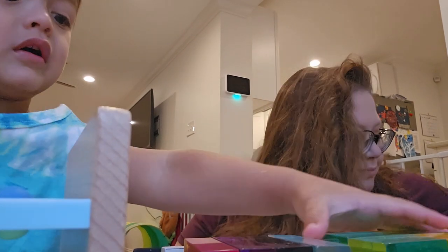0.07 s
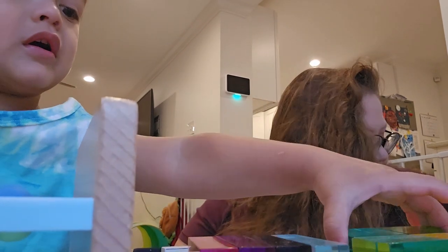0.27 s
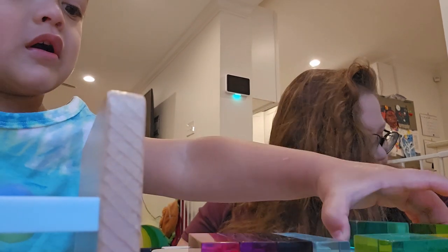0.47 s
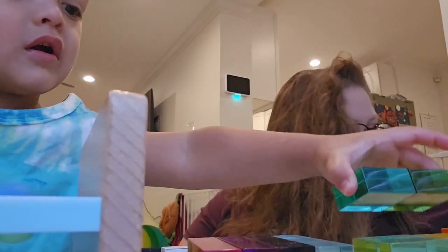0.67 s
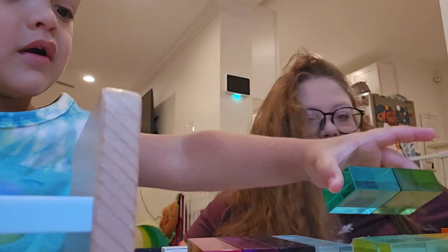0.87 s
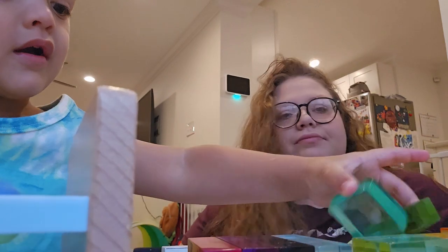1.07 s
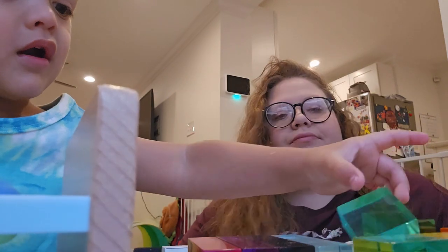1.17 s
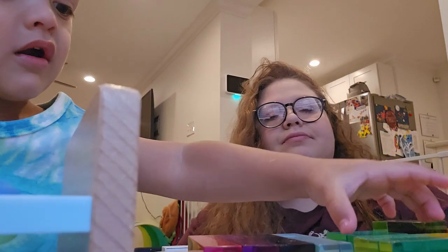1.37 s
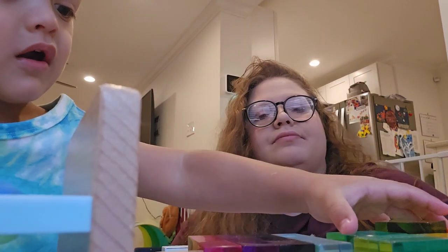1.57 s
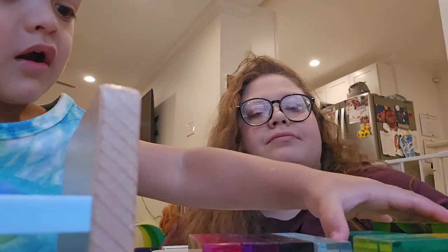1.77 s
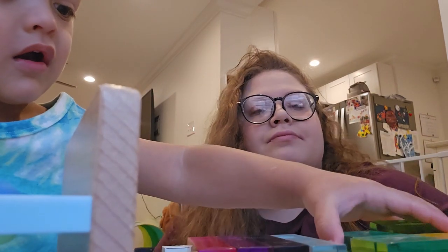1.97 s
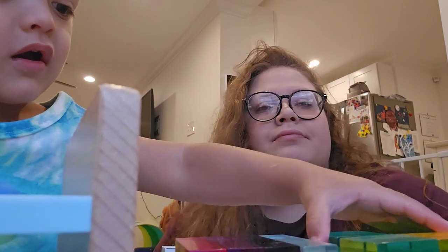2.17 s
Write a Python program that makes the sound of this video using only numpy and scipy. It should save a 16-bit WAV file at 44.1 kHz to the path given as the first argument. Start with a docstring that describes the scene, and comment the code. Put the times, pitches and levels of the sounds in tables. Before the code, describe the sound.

Hard plastic blocks click and clatter on a wooden tray as a hand moves them

```python
"""Room rumble, hiss and mains hum come first, under the soft grit of a hand sliding blocks on a tray.
Hard plastic blocks then click and knock on the wooden tray, on a table close to a two-port microphone:
each click is a short burst of decaying block modes with a noise tick, a hollow knock and a tray thump.
Wall echoes and a short room tail follow, the table jolts at times, and a heap of blocks rattles as it
settles. Sliding is filtered uneven noise; the rattle is many small random contacts."""
import sys
import numpy as np
from scipy import signal
from scipy.fft import rfft, irfft, next_fast_len
from scipy.io import wavfile
from scipy.ndimage import uniform_filter1d

SR = 44100
rng = np.random.default_rng(int(sys.argv[2]) if len(sys.argv) > 2 else 0)


def level_to_linear(level):
    """Convert decibel levels to linear amplitude factors, elementwise."""
    exponent = np.asarray(level, float) / 20
    return 10 ** exponent


def bounce(signal):
    """Save signal as a 16-bit WAV file at the path given by the first command-line argument."""
    frames = np.transpose(np.atleast_2d(signal))
    limited = np.clip(frames, -1, 1)
    pcm = np.round(limited * 32767).astype(np.int16)
    wavfile.write(sys.argv[1], SR, pcm)


N = 98166  # length [samples]

# Main modes of a plastic block: (frequency [Hz], level [dB], t60 [s])
BLOCK_MODES = [(1370, -2, .011), (1590, 0, .012), (1790, 0, .012), (2040, 0, .011), (2270, 0, .012)]
# Upper modes of a plastic block: (frequency [Hz], level [dB], t60 [s])
UPPER_MODES = [(2700, -3, .007), (3160, 0, .007), (3550, 0, .007), (3900, 0, .007), (4400, -1, .006),
               (4800, -5, .006)]
# Hollow modes of the tray wells: (frequency [Hz], level [dB], t60 [s])
WELL_MODES = [(740, -4.5, 0.041), (846, 9, 0.019), (997, 1, 0.033), (1187, 14, 0.0067)]


def evened(x):
    """Scales to rms 1."""
    return x / np.sqrt(np.mean(x ** 2) + 1e-20)


def read(points, hz):
    """Reads a table on a log-frequency axis."""
    f, value = np.transpose(points)
    return np.interp(np.log(hz + 1), np.log(f + 1), value)


def add(mix, s, sound):
    """Mixes a sound in at time s."""
    part = mix[round(s * SR):][:len(sound)]
    part += sound[:len(part)]


def colour(x, gain):
    """Filters by a gain given as a function of Hz."""
    size = next_fast_len(N + 4096)
    spectrum = rfft(x, size) * gain(np.fft.rfftfreq(size, 1 / SR))
    return irfft(spectrum, size)[..., :N]


def background():
    """Room rumble and hiss, partly shared by the ports, and steady mains hum equal in both."""
    # Spectrum of the quiet room: (frequency [Hz], level [dB per Hz, relative])
    floor_tone = [(12, -56.5), (20, -11.5), (67, -7), (130, -15.5), (150, -16), (310, -37.5), (357, -27),
                  (388, -44), (574, -36.5), (624, -42.5), (7950, -62.5), (16000, -83)]
    # Likeness of the two ports: (frequency [Hz], left-right correlation [0 to 1])
    likeness = [(60, 0.89), (240, 1), (950, 0.32), (3770, 0.54), (15000, 0.55)]
    # Mains hum: (frequency [Hz], level [dB rms])
    hum_lines = [(59, -50.5), (119.5, -47.5)]
    floor_db = -41.5  # rms over both ports

    def same(hz):
        return np.clip(read(likeness, hz), -1, 1)

    left, other = rng.standard_normal((2, N))
    right = colour(left, same) + colour(other, lambda hz: np.sqrt(1 - same(hz) ** 2))
    noise = evened(colour(np.array([left, right]), lambda hz: level_to_linear(read(floor_tone, hz))))
    t = np.arange(N) / SR
    hum = 0
    for hz, db in hum_lines:
        hum = hum + np.sqrt(2) * level_to_linear(db) * np.sin(2 * np.pi * (hz * t + rng.random()))
    return level_to_linear(floor_db) * noise + hum


def slide():
    """Dense grit of uneven grains under the stroke of the hand, and the low drag of the tray."""
    # Strokes, each a list of (time [s], hiss [dB rms], low drag [dB rms]), before the ports
    strokes = [
        [(0.0, -56, -60), (0.028, -66, -49.5), (0.046, -47, -59), (0.072, -43, -57), (0.11, -63, -56),
         (0.128, -53, -42), (0.13, -55, -52)],
        [(0.27, -53, -40), (0.322, -77, -33), (0.352, -63, -50), (0.36, -39.5, -43)],
        [(0.46, -59, -34), (0.532, -72.5, -55), (0.544, -78, -56), (0.568, -66, -51), (0.652, -59.5, -64),
         (0.665, -43.5, -39)],
        [(0.72, -55, -58), (0.742, -58.5, -48), (0.78, -36.5, -29.5), (0.84, -51.5, -43.5), (0.93, -62, -46),
         (0.972, -57.5, -47), (1.138, -84.5, -57.5), (1.17, -50, -41.5)],
        [(1.7, -63, -74.5), (1.734, -110.5, -55), (1.812, -62.5, -59.5), (1.84, -71, -56), (1.846, -63, -53.5),
         (1.904, -97.5, -62), (1.964, -88, -61), (1.98, -85, -50.5)],
    ]
    # Hiss of the sliding surfaces: (frequency [Hz], level [dB per Hz, relative])
    hiss_tone = [(590, -21), (1000, -7), (1590, -6.5), (2250, 0), (4310, -6), (7190, -9.5), (9490, -16.5),
                 (14200, -14), (16000, -20)]
    # Tray under the stroke: (frequency [Hz], level [dB per Hz, relative])
    drag_tone = [(110, -24), (170, -4), (250, 0), (400, -5), (700, -12), (1500, -28), (3000, -60)]
    grain, grit_db = 40, 1.5  # samples per grain; mean lift of a grain [dB]

    t = np.arange(N) / SR
    grains = rng.exponential(1, N // grain + 1).repeat(grain)[:N]
    grit = rng.standard_normal(N) * level_to_linear(grit_db * grains)
    out = 0
    for column, tone in enumerate([hiss_tone, drag_tone], start=1):
        level = 0
        for stroke in strokes:
            points = np.transpose(stroke)
            level = level + level_to_linear(np.interp(t, points[0], points[column], left=-120, right=-120))
        sound = evened(colour(grit, lambda hz: level_to_linear(read(tone, hz))))
        out = out + uniform_filter1d(level, 200) * sound
    return out


def ring(modes, db, chance, size):
    """Decaying sines with a soft contact rise, varied in level and tuning by chance, peak 1."""
    scatter_db, detune, rise_s = 2, .02, .00025  # spread per mode [dB], [fraction of Hz]; contact [s]
    hz, level, t60 = np.transpose(modes)[:, :, None]
    t = np.arange(size) / SR
    louder, sharper = chance[:, :len(modes), None]
    envelope = level_to_linear(level + db + scatter_db * louder - 60 * t / t60)
    sines = np.sin(2 * np.pi * hz * (1 + detune * sharper) * t)
    out = (envelope * sines).sum(0) * (1 - np.exp(-t / rise_s))
    return out / abs(out).max()


def blocks():
    """Each click: block ring with rebounds, treble tick, hollow knock, tray thump; (near, into the room)."""
    # Clicks, before the ports: (time [s], main-mode peak [dB], centre of the ring [Hz], then levels
    # re that peak: hollow knock [dB], tray thump before its lift [dB], upper modes [dB],
    # treble tick before its cut [dB])
    clicks = [(0.1367, -11.5, 1650, -19, -15, -1.5, -16), (0.2257, -21.5, 1850, -5, -16, 1, -10),
              (0.2335, -28, 1800, 0, -12.5, 4, -14), (0.247, -19, 1630, -3.5, -8, 1, -2),
              (0.2495, -24, 1780, -17, -11, 9.5, -9), (0.315, -43, 1320, 11, -8, 1, -22),
              (0.3611, -34, 2300, -1, 9.5, 6, -14), (0.371, -16, 1920, 2, -2, 1, -3.5),
              (0.3728, -8.5, 2170, -2.5, -7.5, -5, -36), (0.4323, -20.5, 1700, -0.5, 1, -2.5, -14),
              (0.434, -24.5, 1830, 3, 5, -9, -7.5), (0.543, -37, 2210, -19, -5.5, -12, -15),
              (0.611, -44.5, 2000, -1, 1.5, -6, -8), (0.67, -17.5, 1790, -2, -5.5, 1, -21.5),
              (0.6743, -3.5, 1880, -12, -21.5, -7.5, -9.5), (0.81, -31.5, 1890, -6, -8, -5, -6),
              (0.965, -39, 2120, -10.5, -2.5, -1.5, -11), (1.1815, -10, 1580, -1.5, -16, -1, -20.5),
              (1.1875, -9, 1830, 1, -9.5, 1, -2.5), (1.196, -18, 1350, 2, -5, 2, -26.5),
              (1.2075, -16.5, 2300, -9.5, -13, 11.5, -3.5), (1.218, -4.5, 1600, -1.5, -9, -2.5, 0),
              (1.2282, -24, 1560, -4.5, 0, 6.5, -1.5), (1.2407, -17, 1840, -1.5, 2, 4, -2),
              (1.252, -24, 1600, 11.5, -1.5, 1.5, -4.5), (1.2795, -11.5, 1690, -12, -11.5, 1.5, -20.5),
              (1.2867, -10, 2190, -8.5, -14, -17, -23), (1.295, -17, 2300, 3, -6, 12, -10.5),
              (1.3065, -12.5, 1930, -5.5, -11, 2.5, -8), (1.3227, -11, 2300, -5, -17, -3.5, -13),
              (1.338, -16, 2300, -3, -12, 2.5, -22), (1.3712, -17.5, 1480, -7.5, -8.5, -5.5, -19),
              (1.3737, -15.5, 1850, -18, -17.5, -12, -22.5), (1.386, -24, 1620, -11, -12.5, -1, -7.5),
              (1.394, -8, 2300, -17, -22, 4.5, -11.5), (1.4262, -14, 2080, -5, -22.5, 0, 0),
              (1.4406, -7, 2300, -20, -14.5, 9.5, 7), (1.584, -27.5, 1720, -1, 0.5, -4, -12.5),
              (1.5914, -29.5, 1740, -11.5, 6, -2, -15.5), (1.6146, -25.5, 2300, -8, -13.5, -5, -28),
              (1.805, -48.5, 2190, -3.5, 8.5, 5, -5), (1.846, -39, 1990, -5, -10, -3, -34),
              (2.0024, -20, 1680, -0.5, -3, -5.5, -24), (2.041, -31.5, 1630, -1.5, 5, -16, -26),
              (2.05, -36, 1910, 2, 9, -10, -19), (2.0722, -31, 2080, -14, 1.5, -12, -16),
              (2.0871, -9, 1840, -10, -14.5, 2.5, -5.5)]
    # Modes of the wooden tray: (frequency [Hz], level [dB], t60 [s])
    tray_modes = [(176.4, -13.5, 0.19), (250.2, -6, 0.21), (295, 2.5, 0.059), (410.6, -3, 0.062),
                  (522, -13, 0.048)]
    ring_fall_db = 8  # per octave away from the centre
    thump_rise_s, thump_lift_db = 0.002, 7.5
    tick_s, tick_band_hz, tick_cut_db = 0.0042, [4500, 9900], -9.5  # decay time, band, level
    chatter_s, chatter_db = .003, -9  # rebounds fall within this time; second one re the first

    near, far = np.zeros(N), np.zeros(N)
    hz = np.array(BLOCK_MODES)[:, :1]
    t = np.arange(8000) / SR
    band = signal.butter(2, tick_band_hz, "band", fs=SR)
    snap = signal.lfilter(*band, t[:800] == 0)  # band-limited impulse
    fade = np.exp(-t[:800] / tick_s)
    thump_rise = 1 - np.exp(-t / thump_rise_s)
    for s, db, centre_hz, knock_db, thump_db, upper_db, tick_db in clicks:
        chance = rng.standard_normal((4, 2, 6))
        clack = ring(BLOCK_MODES, -ring_fall_db * abs(np.log2(hz / centre_hz)), chance[0], size=1500)
        add(clack, 0, level_to_linear(upper_db) * ring(UPPER_MODES, 0, chance[3], size=1500))
        knock = ring(WELL_MODES, 0, chance[2], size=2000)
        thump = ring(tray_modes, 0, chance[1], size=8000) * thump_rise

        tick = signal.lfilter(*band, rng.standard_normal(800)) * fade
        tick *= level_to_linear(db + tick_db + tick_cut_db) / abs(tick).max()
        add(near, s, tick)
        # the room gets an impulse with the energy of the tick
        add(far, s, snap * np.linalg.norm(tick) / np.linalg.norm(snap))

        for k, late in enumerate(np.sort(rng.random(2))):
            # rebounds, inverted, the first as strong as the blow
            add(near, s + late * chatter_s, -level_to_linear(db + k * chatter_db) * clack)
        for mix in near, far:
            add(mix, s, level_to_linear(db) * clack)
            add(mix, s, level_to_linear(db + knock_db) * knock)
            add(mix, s, level_to_linear(db + thump_db + thump_lift_db) * thump)
    return near, far


def echoes(dry):
    """Later, weaker copies of the clicks returned by a wall."""
    # Wall echoes: (delay [s], level [dB])
    returns = [(.0094, -12.5), (0.018, -19.5)]
    out = np.zeros(N)
    for s, db in returns:
        add(out, s, level_to_linear(db) * dry)
    return out


def room(x):
    """Sparse random taps dying band by band, different for each port."""
    # Decay of the room: (frequency [Hz], t60 [s])
    decay = [(150, .4), (500, 0.3), (1500, 0.42), (4000, 0.28), (9000, 0.38), (15000, 0.15)]
    room_db = -6
    scatter_t60_s, scatter_lift_db = 0.048, 5  # dense early scatter off the blocks nearby

    taps = np.zeros((2, SR // 2))
    slots = np.arange(100, SR // 2 - 20, 20)  # one tap in every 20 samples
    at = slots + rng.integers(0, 20, (2, len(slots)))
    np.put_along_axis(taps, at, rng.choice([-1., 1.], at.shape), 1)
    hz, t, z = signal.stft(taps, SR, nperseg=256)
    late = level_to_linear(-60 * t / read(decay, hz)[:, None])
    early = level_to_linear(scatter_lift_db - 60 * t / scatter_t60_s)
    tail = signal.istft(z * (late + early), SR, nperseg=256)[1]
    tail = tail / np.linalg.norm(tail[0])
    return level_to_linear(room_db) * signal.fftconvolve(x[None], tail, axes=1)[:, :N]


def table():
    """The table jolts under the microphone and rings in its own low modes."""
    # Jolts, before the ports: (time [s], peak [dB])
    jolts = [(0.369, -17.5), (0.431, -20.5), (0.674, -21), (2.004, -22), (2.059, -24.5)]
    # Modes of the table: (frequency [Hz], level [dB], t60 [s])
    table_modes = [(62.2, -30.5, .2), (90.7, -3, 0.12), (144, -12, 0.126)]
    out = np.zeros(N)
    for s, db in jolts:
        chance = rng.standard_normal((2, len(table_modes)))
        add(out, s, level_to_linear(db) * ring(table_modes, 0, chance, size=12000))
    return out


def rattle():
    """Many small random contacts, of six differing rings, while the blocks settle in a heap."""
    # Settling heap, before the ports: (time [s], level [dB])
    settling = [(1.185, -27), (1.23, -28), (1.27, -32), (1.3, -25), (1.345, -33.5), (1.365, -44.5)]
    contacts_per_s, spread_db, kinds = 450, 4, 6  # spread: mean lift of a contact

    modes = WELL_MODES + BLOCK_MODES + UPPER_MODES
    hits = rng.random(N) < contacts_per_s / SR
    strength = level_to_linear(spread_db * rng.exponential(1, N)) * hits
    kind = rng.integers(0, kinds, N)
    out = 0
    for k in range(kinds):
        contact = ring(modes, 0, rng.standard_normal((2, len(modes))), size=1500)
        out = out + signal.oaconvolve(strength * (kind == k), contact)[:N]
    level_db = np.interp(np.arange(N) / SR, *np.transpose(settling), left=-120, right=-120)
    return evened(out) * level_to_linear(level_db)


def ports(x):
    """A near source reaches the two ports with a level and phase difference, half on each side."""
    # Level difference of the ports: (frequency [Hz], left minus right [dB])
    level_gap = [(60, 0), (150, 4), (300, 6), (600, 0), (1200, 1), (2400, 5), (4000, 4), (5300, -6),
                 (8000, 3), (14000, -2)]
    # Phase difference of the ports: (frequency [Hz], lead of the left [radians])
    phase_gap = [(20, .3), (150, .9), (1000, 1.1), (1800, .9), (2500, -1.9), (4900, -2.2), (5500, -4.6),
                 (6200, -2 * np.pi), (20000, -2 * np.pi)]

    def port(share):
        return colour(x, lambda hz: level_to_linear(share * read(level_gap, hz)) * np.exp(1j * share * read(phase_gap, hz)))

    return np.array([port(.5), port(-.5)])


def scene():
    """Clicks with echoes, sliding, rattle and jolts close by; the room tail and the background."""
    dry, far = blocks()
    rub = slide() + rattle()
    near = dry + rub + echoes(dry)
    return ports(near + table()) + room(far + rub) + background()


def roll_off(x):
    """The treble ends steeply here."""
    return signal.sosfilt(signal.butter(12, 16460, fs=SR, output="sos"), x)


def record(dry):
    """The microphone signal is limited hard at full scale, then low-passed at the top of its band."""
    edge_hz = 16250
    low_pass = signal.firwin(255, edge_hz, window=("kaiser", 9), fs=SR)
    mix = signal.oaconvolve(np.clip(dry, -1, 1), low_pass[None], "same")
    return roll_off(mix)


dry = scene()
out = record(dry)
bounce(out)
```